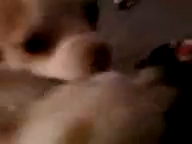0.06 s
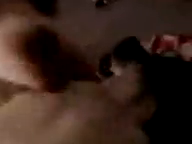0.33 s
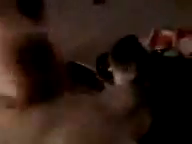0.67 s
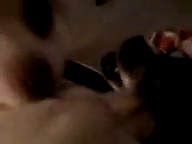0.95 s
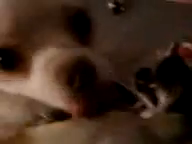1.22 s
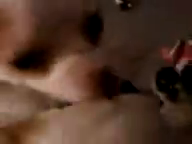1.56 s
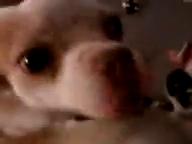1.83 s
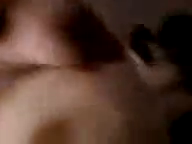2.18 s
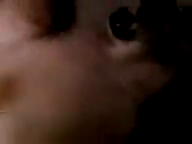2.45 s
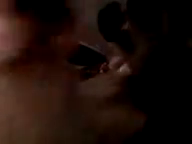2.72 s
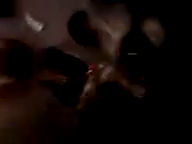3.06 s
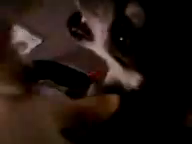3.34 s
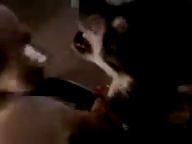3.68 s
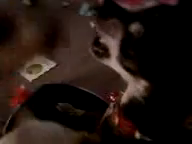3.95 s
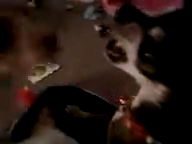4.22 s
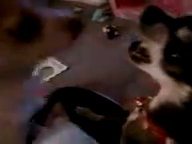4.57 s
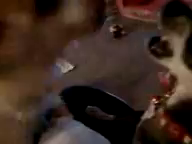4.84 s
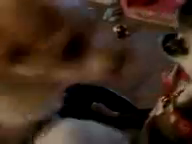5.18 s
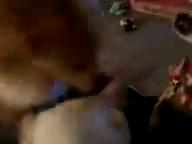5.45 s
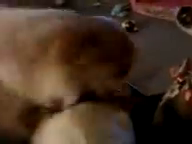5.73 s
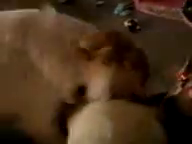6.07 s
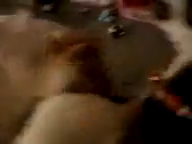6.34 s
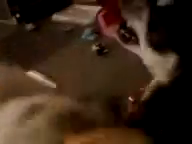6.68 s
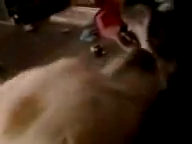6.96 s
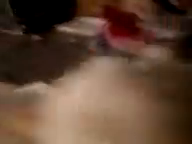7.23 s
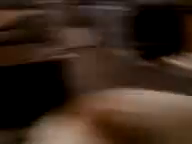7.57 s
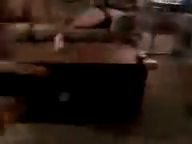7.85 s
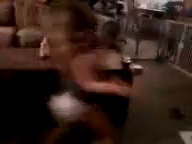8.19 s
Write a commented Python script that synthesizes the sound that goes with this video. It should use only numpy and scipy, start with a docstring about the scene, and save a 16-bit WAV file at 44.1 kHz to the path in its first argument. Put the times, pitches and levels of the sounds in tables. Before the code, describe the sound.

A small dog growls close by in long, throbbing stretches with rattling snorts between, and a shrill squeal cuts in near the end.

```python
"""In a quiet room, a small dog growls right at the microphone: five throbbing growls after a faint whimper.
Its vocal folds buzz, stall and restart, and its throat and mouth shape the buzz. Between growls the soft
palate flaps in rattling snorts; lips and palate smack. Late on come a soft rustle and, from farther off,
a shrill squeal that overloads the microphone's narrow, telephone-like sound."""
import sys
import numpy as np
from scipy import signal
from scipy.fft import rfft, irfft, next_fast_len
from scipy.io import wavfile
from scipy.ndimage import uniform_filter1d

SR = 44100
rng = np.random.default_rng(int(sys.argv[2]) if len(sys.argv) > 2 else 0)


def waveform_to_disk(signal):
    """Save audio, clipped to [-1, 1], as 16-bit WAV at the path in sys.argv[1]."""
    frames = np.transpose(np.atleast_2d(signal))
    scaled = np.clip(frames, -1, 1) * 32767
    samples = np.round(scaled).astype(np.int16)
    wavfile.write(sys.argv[1], SR, samples)


N = 362061
TIME = np.arange(N) / SR

# the room's steady background noise: f/Hz, level/dB
BACKGROUND_COLOUR = [(20, -29), (60, -3.5), (300, 6.5), (600, -7.5), (3500, -11), (4200, -19)]
# a closed-mouth whimper: t/s, pitch/Hz, level/dB, fourth harmonic against the first/dB
WHIMPER_PATH = [(0, 320, -30.5, -11), (.022, 289, -37.5, 12), (.045, 283, -32, -10), (.09, 236, -34.5, -2)]
# smacks of the lips and palate: t/s, level/dB, f/Hz
LIP_SMACKS = [(.1, -13.5, 2290), (1.35, -4.5, 1345), (1.689, 0, 1220), (1.8, -5.5, 980), (1.858, -10, 1040),
              (2.029, 0.5, 2630), (3.368, 1, 1510), (3.426, 0, 1534), (5.637, -7, 1350)]
# how fast the vocal folds buzz, one list a growl: t/s, pitch/Hz
GROWL_PITCHES = [
    [(.125, 226), (.4, 229), (.48, 255), (.65, 241), (.8, 246), (1.0, 241), (1.26, 236.7), (1.29, 220.5),
     (1.37, 231), (1.43, 204), (1.47, 180)],
    [(1.992, 256), (2.3, 268), (2.44, 290), (2.485, 277), (2.52, 297), (2.562, 270), (2.598, 299),
     (2.63, 262), (2.76, 259), (2.95, 245), (3.15, 243), (3.29, 220)],
    [(3.745, 226), (3.95, 235), (4.14, 262), (4.42, 240), (4.65, 213), (5.05, 202), (5.4, 190), (5.52, 168)],
    [(6.05, 228.7), (6.4, 223.3), (6.55, 201.2), (6.9, 190), (7.5, 185)],
    [(7.987, 236.5), (8.21, 245.8)],
]
# how hard the dog pushes and how far its lips part, one list a growl: t/s, effort/dB, opening/dB
GROWL_EFFORTS = [
    [(.125, -34.5, 1.5), (.3, -33, 4.5), (.52, -29, 5.5), (1.15, -28, 9), (1.33, -27, 7.5), (1.46, -32, 0)],
    [(1.992, -33, 14.5), (2.1, -30, 11), (2.33, -26, 8.5), (2.5, -24, 12), (2.7, -25.5, 8.5),
     (2.93, -28, 13), (3.2, -29.5, 9), (3.285, -36, 4)],
    [(3.745, -35, 8.5), (3.88, -28, 4.5), (4.08, -30, 5), (4.7, -28, 3.5), (5.1, -28.5, 1.5),
     (5.4, -30.5, 0), (5.52, -33, -2)],
    [(6.05, -33, -7), (6.15, -33, -5), (6.6, -28.5, -15), (7.0, -29, -11.5), (7.36, -31, -8),
     (7.5, -33, -19)],
    [(7.987, -35, 11), (8.21, -33, 9)],
]
# stalls of the folds between throbs, one list a growl: t/s, dip of the folds/dB, dip of the mouth/dB
GROWL_BREAKS = [
    [(.143, 11.5, 7), (.173, 6.5, 6.5), (.208, 13, 5), (.25, 13, 13.5), (.281, 13, 9.5), (.316, 10.5, 14.5),
     (.35, 7.5, -1), (.386, 15, 5), (.421, 8.5, 1.5), (.455, 14.5, -2), (.523, 23, 2.5), (.589, 5.5, -2),
     (.627, 14.5, 3), (.771, 9, 3.5), (.847, 15.5, 0), (.979, 18, 5), (1.341, 29.5, 13.5),
     (1.402, 13.5, -7)],
    [(2.016, 8, 25), (2.049, 10.5, 0.5), (2.083, 22.5, 6.5), (2.117, 27.5, 10), (2.156, 13, 2),
     (2.188, 25.5, 10.5), (2.259, 14.5, 8.5), (2.295, 8, -1), (2.333, 12, -6), (2.409, 16, 1.5),
     (2.47, 5.5, 0), (2.612, 9, 2), (2.652, 24.5, 0), (2.7, 12.5, 1), (2.744, 12, -1.5), (2.806, 8, 1),
     (2.846, 12, -0.5), (2.895, 9, -2.5), (2.969, 29, 4), (3.061, 13, 5), (3.122, 15, -1.5),
     (3.19, 14.5, 21.5), (3.255, 12, 3.5)],
    [(3.769, 11.5, 12), (3.804, 20.5, 8.5), (3.84, 25, 4), (3.87, 14, -5.5), (3.906, 23, 6),
     (3.943, 23, 2.5), (3.983, 17, -1.5), (4.025, 14.5, 4.5), (4.06, 11.5, 1), (4.099, 25, 2),
     (4.137, 8.5, -2), (4.184, 12.5, 4.5), (4.22, 13, 2), (4.269, 8, -4), (4.34, 20.5, -3),
     (4.389, 33.5, -1), (4.434, 17, -1.5), (4.486, 10, -9), (4.529, 20.5, -2.5), (4.578, 12, 0.5),
     (4.624, 12.5, 0.5), (4.685, 13.5, -3), (4.726, 10, 3), (4.775, 10, -1), (4.817, 12, 8.5),
     (4.863, 11, -4), (4.935, 9.5, -1), (4.978, 30, 10), (5.029, 24.5, 1), (5.085, 11, 4.5), (5.163, 7, 15),
     (5.219, 5, 4), (5.303, 20.5, 4.5), (5.359, 13, 11), (5.442, 14, 17)],
    [(6.078, 26, 0.5), (6.109, 26.5, 2.5), (6.141, 32, -2.5), (6.18, 12.5, 5), (6.215, 28, -7),
     (6.253, 19.5, 16.5), (6.292, 22.5, 8.5), (6.328, 30.5, 6), (6.37, 28.5, 18.5), (6.417, 13, 5),
     (6.452, 15, 4), (6.494, 17.5, 4), (6.54, 1.5, -0.5), (6.588, 12.5, -4.5), (6.656, 8.5, -3.5),
     (6.703, 9.5, 1.5), (6.775, 20, 13), (6.818, 16.5, 14.5), (6.895, 20.5, 8.5), (7.056, 15.5, 12),
     (7.146, 2, 1), (7.219, 20.5, -4), (7.269, 17, 5), (7.335, 17.5, 4.5)],
    [(8.013, 18, 12), (8.044, 11.5, 5.5), (8.082, 3, 0), (8.152, 12.5, 9.5)],
]
# the jaw, one row a growl: throat/Hz, throat/dB, teeth/dB, teeth fade/(dB/s), teeth width/Hz
JAW_SHAPES = [(690, 3.5, -4.5, -0.5, 440), (743, 5.5, -1.5, 6, 485), (644, 0.5, -6, 1, 350),
              (510.4, 3, 8, 13, 200), (668, 1.5, -10, -14, 340)]
# how rough the voice is and where the muzzle rings: t/s, roughness/(0-1), mouth/Hz, teeth/Hz
MUZZLE_PATH = [(.1, 0.83, 1070, 2370), (.4, 0.45, 1160, 2360), (.55, 0.11, 1180, 2540),
               (1.28, 0.11, 1234, 2650), (1.45, 0.3, 1170, 2380), (1.9, 0.51, 1113, 2370),
               (2.1, 0.67, 1220, 2470), (2.35, 0.41, 1270, 2430), (2.5, 0.37, 1348, 2396),
               (2.58, 0.17, 1384, 2330), (2.64, 0.44, 1264, 2320), (2.8, 0.43, 1335, 2300),
               (3.1, 0.33, 1485, 1890), (3.5, 0.6, 1488, 2190), (3.9, 0.7, 1240, 2110),
               (4.4, 0.6, 1348, 2300), (4.7, .43, 1251, 2260), (5.4, .36, 1250, 2070),
               (6.1, 0.63, 1180, 2445), (6.65, 0.52, 960, 2660), (6.9, 0.16, 1100, 2240),
               (7.45, 0.3, 1267, 2460), (8.05, 0.41, 1270, 2200)]
# how the muzzle colours a growl: f/Hz, gain/dB
GROWL_COLOUR = [(90, 2.5), (180, -5.5), (260, 5), (370, 9), (470, 1.5), (600, 5), (800, 3.5), (1000, 3),
                (1400, 2), (1850, 5), (2400, 1), (2900, -1), (3080, -5.5), (3300, -11), (4000, -5.5)]
# spurts of air, one list a snort: t/s, length/s, chest/dB, mouth/dB
SNORT_SPURTS = [
    [(1.517, 0.06, -23, -31.5), (1.598, 0.078, -23, -29), (1.668, 0.072, -22.5, -28),
     (1.75, 0.07, -29.5, -31.5), (1.845, 0.046, -23.5, -29)],
    [(3.33, 0.046, -21.5, -26.5), (3.42, 0.068, -24.5, -33), (3.488, 0.1, -32, -33),
     (3.6, 0.067, -40.5, -49)],
    [(5.583, 0.051, -28, -36), (5.665, 0.085, -37, -50.5)],
    [(7.935, 0.034, -31.5, -47.5)],
]
# palate and nose, one row a snort: flap rate/Hz, throat/dB, teeth/dB (both against the mouth)
PALATE_SHAPES = [(150.2, 3.5, -7), (110, -3, -9), (80.4, 2.5, 0), (145, 7, -15)]
# how the nose colours a snort: f/Hz, gain/dB
SNORT_COLOUR = [(70, -11.5), (125, -2.5), (200, -2.5), (450, 1), (950, 5.5), (1500, 7), (1900, 1.5),
                (2500, 1.5), (3100, 0)]
# air hissing through the nose in the second snort: t/s, level/dB
HISS_LEVELS = [(3.33, -40.5), (3.55, -41.5), (3.68, -54)]
# the swell of a soft rustle: t/s, level/dB
RUSTLE_LEVELS = [(6.66, -63), (6.82, -35), (7.0, -32), (7.2, -35.5), (7.75, -36.5), (7.95, -45),
                 (8.21, -38.5)]
# the rustle's mix of low and high: f/Hz, level/dB
RUSTLE_SPECTRUM = [(60, -9), (200, -5.5), (600, -4), (1200, -6), (2400, -2), (3200, -9.5), (4000, -20)]
# the squeal, one list a burst: t/s, pitch/Hz, level/dB, roughness/(0-1)
SQUEAL_PATHS = [
    [(7.19, 2280, -28, 0.2), (7.245, 2573, -16, 0.1), (7.29, 2690, -5.5, 0.3), (7.34, 2804, -8, 0.4),
     (7.395, 2950, -6.5, 0.56), (7.43, 3020, -12, 0.65), (7.49, 2973, -13, 0.8), (7.525, 2837, -6.5, 0.35),
     (7.57, 2800, -23, 0.1)],
    [(7.56, 2150, -4.5, 0), (7.575, 2134, -3, 0.21), (7.6, 2146, -10, 0.6), (7.625, 2418, -5, 0),
     (7.675, 2519, -9.5, 0.1), (7.71, 2503, -8, 0.3), (7.755, 2340, -8.5, 0.3), (7.8, 2220, -18.5, 0.5)],
    [(7.818, 2370, -22, 0.1), (7.835, 2290, 4, 0.08), (7.855, 2090, -3.5, 0.44), (7.875, 1960, -18.5, 0),
     (7.888, 1950, -28, .5)],
]
# how long echoes take to fall by 60 dB: f/Hz, decay/s
ECHO_DECAY = [(100, 0.46), (300, 0.66), (1000, 0.38), (3000, 0.19)]
# low notes the room rings at: f/Hz, gain/dB, time to fall by 60 dB/s
ROOM_NOTES = [(285, -19, 1.0), (350, -18, 1.1)]
# the narrow band the microphone lets through: f/Hz, gain/dB
MICROPHONE_BAND = [(20, -7.5), (60, 5), (120, 9.5), (2900, 0), (3300, -1), (3700, -7), (4100, -14),
                   (4500, -31.5), (5000, -99)]

BREAK_S, BREAK_GROWTH_S_PER_S = .0077, .0035  # half-length of a break; it grows as the air runs out
SCOOP, SCOOP_S, SCOOP_FULL_DB = .08, .014, 15  # pitch sag: share, half-length, break depth for a full sag
ARCH, CHEEK_SWEEP = .2392, .14  # swing in a throb: of the pitch (times roughness), of the cheeks' ring
MOUTH_WIDTH_HZ, THROAT_FADE_DB_PER_S = 235, 5.5
CHEEK_HZ, CHEEK_WIDTH_HZ, CHEEK_DB = 1680, 700, -7.5
SPURT_RISE_S, SPURT_SAG_DB_PER_S, SPURT_RELEASE_DB_PER_S = .0052, 3.5, 649
SQUEAL_BEAT_HZ, SQUEAL_FLUTTER_HZ = 88, 790
CEILING, CLIP, TREBLE_LIMIT_HZ = .775, .72, 15900


def amp(db):
    """Turns decibels into a multiplier."""
    return 10 ** (np.asarray(db) / 20)


def evened(x):
    """Scales x to an average strength (rms) of 1."""
    return x / np.sqrt(np.mean(x ** 2) + 1e-20)


def read(points, hz):
    """Looks up hz in a table, joining its rows by straight lines on a log-frequency axis."""
    f, value = np.transpose(points)
    return np.interp(np.log(hz + 1), np.log(f), value)


def curves(rows, t):
    """Every column of a table at the times t."""
    s, *columns = np.transpose(rows)
    return [np.interp(t, s, c) for c in columns]


def span(rows):
    """Sample times from the first row to the last."""
    return np.arange(rows[0][0], rows[-1][0], 1 / SR)


def add(mix, s, sound):
    """Mixes a sound in, starting at s seconds."""
    part = mix[max(round(s * SR), 0):][:len(sound)]
    part += sound[:len(part)]


def coloured(x, points):
    """Turns each frequency of x up or down as the table says."""
    size = next_fast_len(len(x) + 4096)
    gain = amp(read(points, np.fft.rfftfreq(size, 1 / SR)))
    return irfft(rfft(x, size) * gain, size)[:len(x)]


def wander(t, per_s):
    """A random wobble of size 1 that heads for a new value per_s times a second."""
    knots = np.arange(t[0], t[-1] + 2 / per_s, 1 / per_s)
    values = np.resize(rng.standard_normal(8192), len(knots))
    return evened(np.interp(t, knots, values))


def fade(t, seconds):
    """A soft start and end, so nothing clicks."""
    return np.clip(np.minimum(t - t[0], t[-1] - t) / seconds, 0, 1)


def steadied(x, seconds):
    """Holds the strength near 1 over the given time, keeping faster throbs."""
    size = max(int(seconds * SR), 2)
    power = uniform_filter1d(uniform_filter1d(x ** 2, size), size)
    return x / np.sqrt(abs(power) + 1e-14)


def resonate(x, hz, width):
    """Makes x ring like a hollow space, in a band that follows hz."""
    turn = np.exp(2j * np.pi * np.cumsum(hz * np.ones(len(x))) / SR)
    r = np.exp(-np.pi * width / SR)
    return 2 * (turn * signal.lfilter([(1 - r) ** 2], [1, -2 * r, r * r], x / turn + 1e-18)).real


def wobbly_phase(t, hz, depth, per_s):
    """The angle of a wave whose pitch wobbles around hz."""
    return 2 * np.pi * np.cumsum(hz * (1 + depth * wander(t, per_s))) / SR


def pulses(turns, spread):
    """One pulse for each whole turn; spread delays the upper harmonics, which softens it."""
    return evened(sum(np.cos(2 * np.pi * k * turns - spread * k * k) for k in range(1, 30)))


def puffs(turns, length):
    """Air noise, strongest just after each pulse."""
    return evened((.3 + np.exp(-(turns % 1) / length)) * rng.standard_normal(len(turns)))


def noise(colour):
    """A steady rushing sound of the given colour."""
    return evened(coloured(rng.standard_normal(N), colour))


def whimper():
    """A faint hum whose fourth harmonic briefly stands out as it meets the mouth's ring."""
    t = span(WHIMPER_PATH)
    hz, level_db, fourth_db = curves(WHIMPER_PATH, t)
    phase = wobbly_phase(t, hz, depth=.079, per_s=160)
    hum = np.sin(phase) + amp(fourth_db) * np.sin(4 * phase)
    return t[0], amp(level_db) * np.sqrt(2) * hum * fade(t, .0019)


def smack(s, level_db, hz):
    """A single slap of the lips or palate that dies in a few milliseconds."""
    t = np.arange(1200) / SR
    high = np.sin(2 * np.pi * hz * t) * np.exp(-t / .002)
    low = .7 * np.sin(2 * np.pi * .6 * hz * t) * np.exp(-t / .0012)
    return s, amp(level_db) * (high + low) * np.minimum(t / .0007, 1)


def stalls(t, breaks):
    """At a break the folds fade and return, the mouth shuts slowly and bursts open, and the pitch sags."""
    half_s = BREAK_S + BREAK_GROWTH_S_PER_S * (t - t[0])
    stall_db, shut_db, scoop = 0, 0, 0
    for s, folds_db, mouth_db in breaks:
        away = np.minimum(abs(t - s) / half_s, 5)
        stall_db += folds_db * np.exp(-away ** 1.6)
        shut_db += mouth_db * np.exp(-(away / 1.15) ** np.where(t < s, 2, 4))
        scoop += min(folds_db / SCOOP_FULL_DB, 1) * np.exp(-np.minimum(((t - s) / SCOOP_S) ** 2, 30))
    return stall_db, shut_db, scoop


def growl(pitches, efforts, breaks, jaw):
    """Vocal folds buzz in throbs; chest, throat, mouth, cheeks and teeth ring with the buzz."""
    throat_hz, throat_db, teeth_db, teeth_fade_db, teeth_width = jaw
    t = span(pitches)
    age = t - t[0]
    pitch, = curves(pitches, t)
    effort_db, open_db = curves(efforts, t)
    rough, mouth_hz, teeth_hz = curves(MUZZLE_PATH, t)
    rough = np.clip(rough, 0, .7)
    stall_db, shut_db, scoop = stalls(t, breaks)
    # one throb lasts from each break to the next
    edges = [t[0]] + [row[0] for row in breaks] + [t[-1]]
    throb = 2 * np.pi * np.interp(t, edges, np.arange(len(edges)))
    # the pitch climbs within each throb and sags around each break
    arch = -ARCH * rough * np.cos(throb - 1.4) - SCOOP * (scoop - scoop.mean())
    jitter = (.006 + .03 * rough) * wander(t, 65)
    jitter += (.009 + .045 * rough + .06 * scoop) * wander(t, 330)
    turns = np.cumsum(pitch * (1 + arch + jitter)) / SR
    folds = -pulses(turns, spread=.27) * amp((.5 + 2.5 * rough) * wander(t, 220) - .4 * stall_db)
    air = (.07 + rough + .45 * scoop) * puffs(turns, length=.32)
    tremble = 1 + (.01 + .055 * rough) * wander(t, 55)
    cheek_hz = CHEEK_HZ * (1 + CHEEK_SWEEP * np.sin(throb))
    lips_db = effort_db + open_db  # parted lips let out the mouth, cheeks and teeth
    throat_level = effort_db + throat_db - THROAT_FADE_DB_PER_S * age
    teeth_level = lips_db + teeth_db - teeth_fade_db * age
    # chest first: f/Hz, width/Hz, level/dB, dip/dB, share of air
    hollows = [(pitch, 200, effort_db, stall_db, .4),
               (throat_hz * tremble, 460, throat_level, .28 * stall_db + 1.3 * shut_db, .6),
               (mouth_hz * tremble, MOUTH_WIDTH_HZ, lips_db, shut_db, .8),
               (cheek_hz * tremble, CHEEK_WIDTH_HZ, lips_db + CHEEK_DB, shut_db + .13 * stall_db, 1),
               (teeth_hz * tremble, teeth_width, teeth_level, shut_db + .2 * stall_db, 1)]
    out = 0
    for hz, width, level_db, dip_db, share in hollows:
        gurgle_db = share * (1.5 + 2.2 * rough) * wander(t, 90)
        ring = steadied(resonate(folds + share * air, hz, width), .025)
        out += amp(level_db) * ring * steadied(amp(gurgle_db - dip_db), .1)
    return t[0], coloured(out * fade(t, .006), GROWL_COLOUR)


def snort(s, length, chest_db, mouth_db, flap_hz, throat_db, teeth_db):
    """One spurt: the flapping soft palate rings chest, throat and mouth; air hisses past the teeth."""
    age = np.arange(0, length + .1, 1 / SR)
    t = s + age
    _, mouth_hz, teeth_hz = curves(MUZZLE_PATH, t)
    drop_db = SPURT_SAG_DB_PER_S * age + SPURT_RELEASE_DB_PER_S * np.maximum(age - length, 0)
    push = np.minimum(age / SPURT_RISE_S, 1) * amp(-drop_db)
    turns = np.cumsum(flap_hz * np.exp(.36 * wander(t, 170))) / SR
    air = puffs(turns, length=.3)
    slaps = pulses(turns, spread=.03) + .5 * air
    # what drives it, f/Hz, width/Hz, level/dB, how much it gurgles
    hollows = [(slaps, 165, 190, chest_db, .4),
               (slaps, 700, 480, mouth_db + throat_db, 1),
               (slaps, mouth_hz, 360, mouth_db, .7),
               (air, teeth_hz, 450, mouth_db + teeth_db, .5)]
    out = 0
    for drive, hz, width, level_db, gurgle in hollows:
        uneven = drive * amp(4 * gurgle * wander(t, 160))
        ring = resonate(uneven, hz * np.exp(.17 * gurgle * wander(t, 110)), width)
        out += amp(level_db) * steadied(ring, .035)
    return s, coloured(out * push, SNORT_COLOUR)


def nose_hiss():
    """Air drawn through narrow nostrils."""
    t = span(HISS_LEVELS)
    level_db, = curves(HISS_LEVELS, t)
    return t[0], amp(level_db) * evened(resonate(rng.standard_normal(len(t)), hz=3490, width=520))


def rustle():
    """A soft hiss that swells late on, its level flickering."""
    level_db, = curves(RUSTLE_LEVELS, TIME)
    return noise(RUSTLE_SPECTRUM) * amp(level_db + 2.9 * wander(TIME, 45))


def squeal(rows):
    """A shrill tone with a weaker one above it; it pulses and breaks into a rasp as it roughens."""
    t = span(rows)
    hz, level_db, rough = curves(rows, t)
    phase = wobbly_phase(t, hz, depth=.006 + .05 * rough, per_s=650)
    flutter = wobbly_phase(t, SQUEAL_FLUTTER_HZ, depth=.48, per_s=400)
    tone = evened(np.sin(phase) + (.12 + .42 * rough) * np.sin(phase + flutter))
    hiss = resonate(rng.standard_normal(len(t)), hz * 1.02, width=760)
    rasp = evened(resonate(hiss, hz * 1.04, width=1000))
    beat = np.sin(wobbly_phase(t, SQUEAL_BEAT_HZ, depth=.3, per_s=90))
    beat_depth = np.minimum(.2 + 1.1 * rough, .6)
    voice = ((1 - rough) * tone + .8 * rough * rasp) * (1 + beat_depth * beat)
    return t[0], amp(level_db) * steadied(voice, .018) * fade(t, .005)


def room_echo(x):
    """Many small echoes blur together, each band of frequencies dying at its own speed."""
    size = SR * 3 // 4
    echoes = rng.standard_normal(size) * (rng.random(size) < .1) * (np.arange(size) > .004 * SR)
    hz, t, bands = signal.stft(echoes, SR, nperseg=256)
    decay = amp(-60 * t / read(ECHO_DECAY, hz)[:, None])
    _, tail = signal.istft(bands * decay, SR, nperseg=256)
    return signal.fftconvolve(x, tail / np.linalg.norm(tail))[:N]


def room_ring(x):
    """The room's low notes go on humming faintly after each growl."""
    out = 0
    for hz, gain_db, decay_s in ROOM_NOTES:
        r = np.exp(-np.log(1000) / (decay_s * SR))
        out += amp(gain_db) * 2 * signal.lfilter([1 - r], [1, -r * np.exp(2j * np.pi * hz / SR)], x).real
    return out


def scene():
    """The close dog and the farther, more echoing squeal, over the rustle and faint background noise."""
    dog, far = np.zeros(N), np.zeros(N)
    for parts in zip(GROWL_PITCHES, GROWL_EFFORTS, GROWL_BREAKS, JAW_SHAPES):
        add(dog, *growl(*parts))
    for spurts, shape in zip(SNORT_SPURTS, PALATE_SHAPES):
        for spurt in spurts:
            add(dog, *snort(*spurt, *shape))
    for row in LIP_SMACKS:
        add(dog, *smack(*row))
    add(dog, *whimper())
    add(dog, *nose_hiss())
    for rows in SQUEAL_PATHS:
        add(far, *squeal(rows))
    direct = amp(-6.5) * dog + amp(-4) * far + rustle()
    echoes = room_echo(amp(-19.5) * dog + amp(-9) * far) + room_ring(dog)
    background = amp(-52) * noise(BACKGROUND_COLOUR)
    return (direct + echoes + background)[None]


def record(dry):
    """The microphone keeps a narrow band; loud peaks are turned down fast, and any overshoot crackles."""
    narrow = coloured(dry[0], MICROPHONE_BAND)
    outline = abs(signal.hilbert(narrow, next_fast_len(N))[:N])
    level = uniform_filter1d(uniform_filter1d(outline, size=42), size=42)
    limited = narrow / (1 + (level / CEILING) ** 8) ** (1 / 8)
    clipped = np.clip(limited, -CLIP, CLIP)
    treble_cut = signal.firwin(511, TREBLE_LIMIT_HZ, window=("kaiser", 9), fs=SR)
    return signal.oaconvolve(clipped, treble_cut, "same")[None]


dry = scene()
out = record(dry)
waveform_to_disk(out)
```